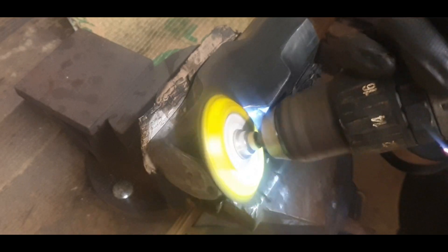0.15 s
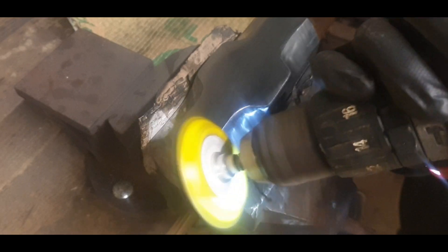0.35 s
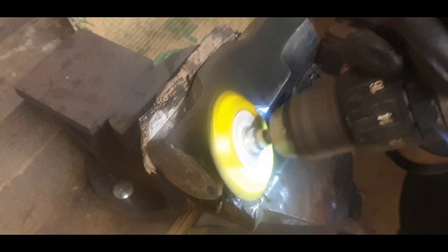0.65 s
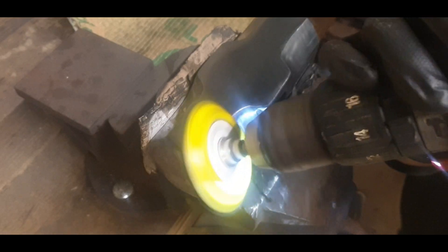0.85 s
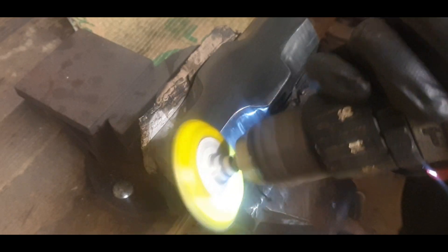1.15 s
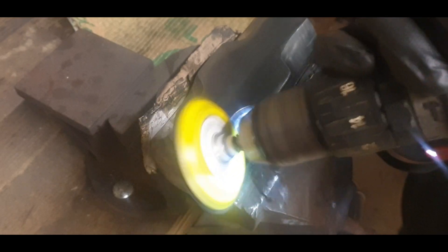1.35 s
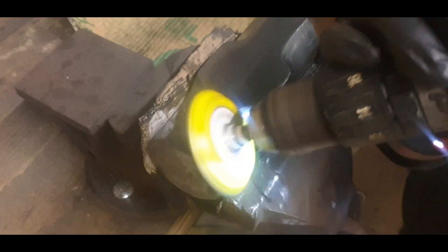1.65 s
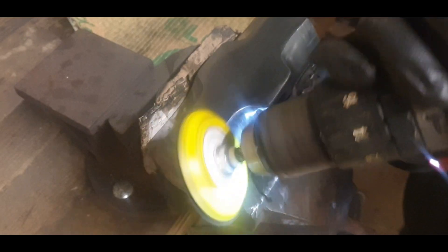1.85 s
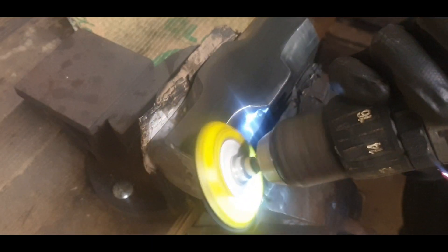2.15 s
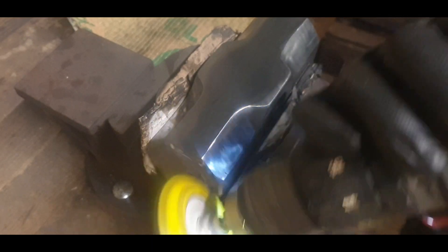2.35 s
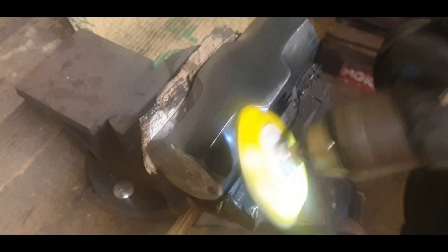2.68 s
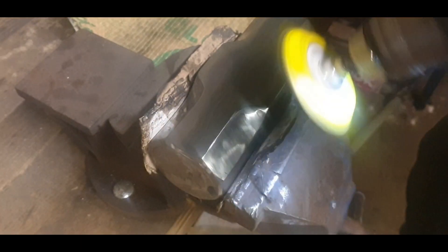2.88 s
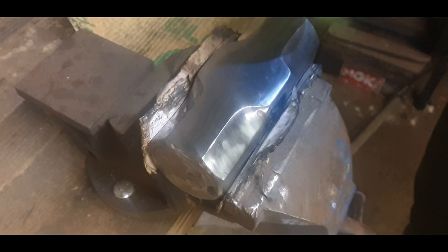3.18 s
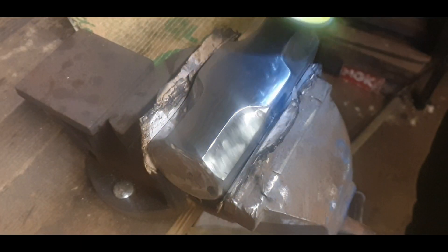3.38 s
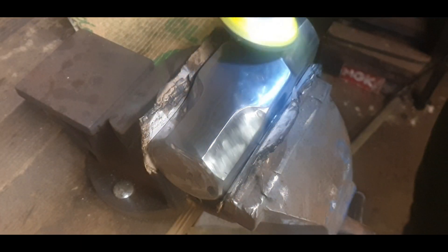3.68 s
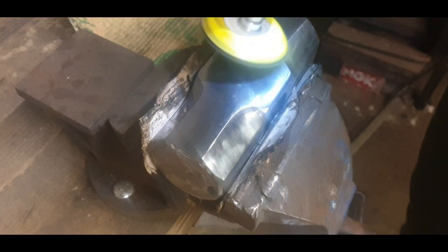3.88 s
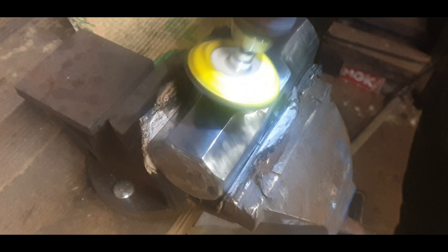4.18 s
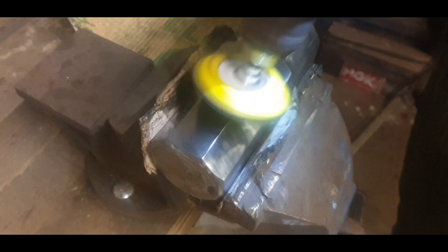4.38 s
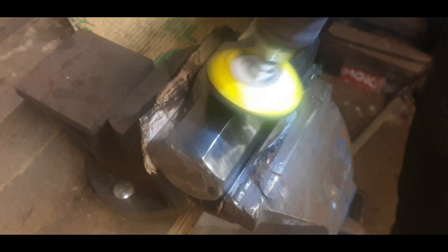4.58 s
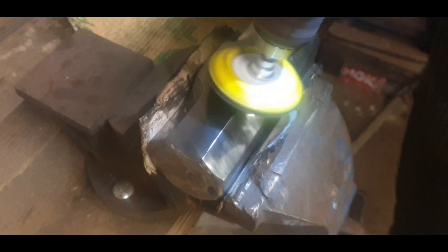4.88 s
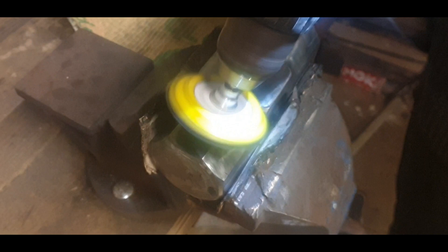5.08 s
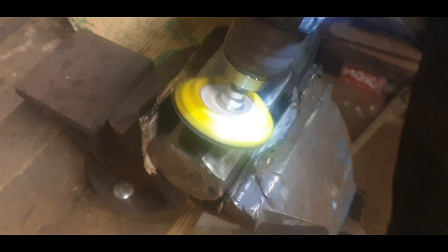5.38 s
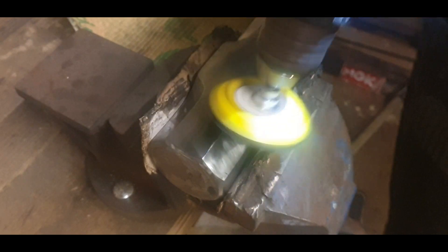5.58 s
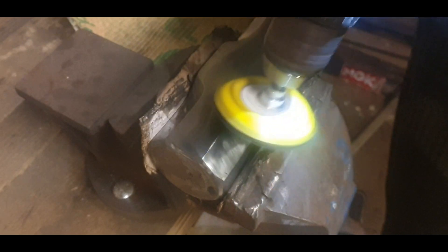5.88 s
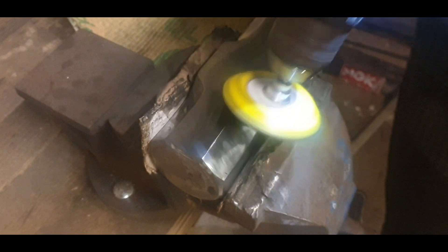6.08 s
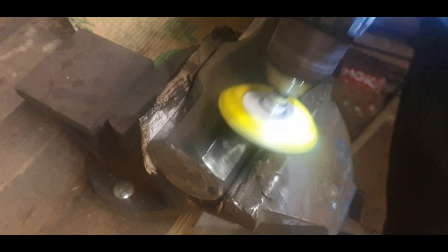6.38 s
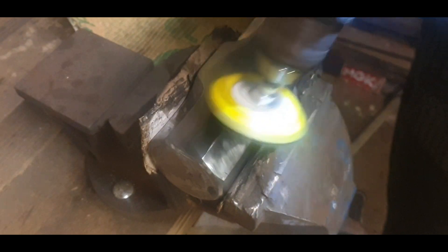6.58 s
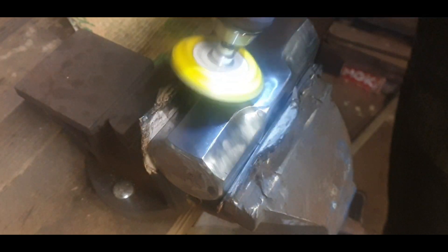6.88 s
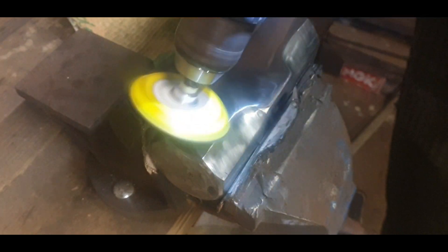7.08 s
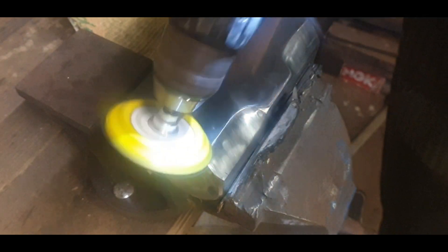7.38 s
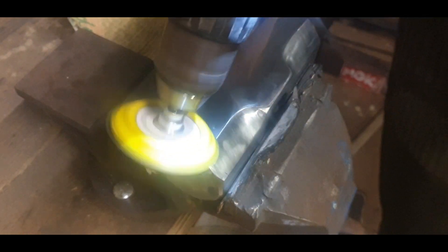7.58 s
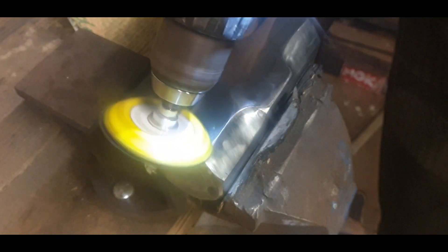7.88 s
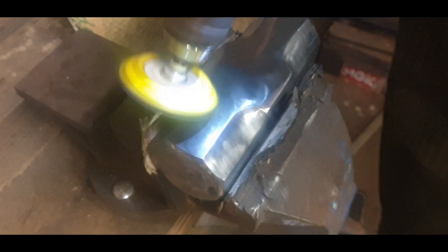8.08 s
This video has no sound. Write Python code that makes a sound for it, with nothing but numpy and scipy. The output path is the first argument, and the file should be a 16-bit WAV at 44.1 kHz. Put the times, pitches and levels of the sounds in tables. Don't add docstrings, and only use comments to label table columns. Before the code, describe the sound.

Close cordless drill held at full speed, a hard steady electric whine with a soft polishing pad hissing over a steel hammer head.

```python
import sys
import numpy as np
from scipy import signal
from scipy.io import wavfile
from scipy.ndimage import uniform_filter1d

SR = 44100
rng = np.random.default_rng(int(sys.argv[2]) if len(sys.argv) > 2 else 0)


def how_loud(loudness_db):
    steps = np.asarray(loudness_db, float) / 20
    return 10 ** steps


def dump_mix(stems):
    frames = np.atleast_2d(stems).T
    limited = np.clip(frames, -1, 1)
    pcm = np.round(limited * 32767).astype(np.int16)
    wavfile.write(sys.argv[1], SR, pcm)


N = 363384
TIME = np.arange(N) / SR
FRAME, HOP = 1024, 256

AIR_AND_PAD = [(60, -83, -86, -96), (130, -83.5, -83, -88), (236, -87, -82, -79), (490, -69.5, -72.5, -70),
               (730, -73, -69.5, -69), (1264, -61, -63.5, -62), (1630, -63, -66.5, -65),
               (3480, -66.5, -63.5, -61.5), (4750, -65, -70.5, -69), (6070, -72.5, -77.5, -75.5),
               (8030, -86, -87.5, -87), (9300, -80, -82.5, -84.5), (11300, -72, -73, -71.5),
               (13600, -76.5, -79, -77.5)]


def shaft(jitter_hz=.13):
    # t/s, f/Hz
    speed = [(0, 304.7), (.3, 304.6), (.45, 303), (1.12, 303.2), (1.25, 304.4), (1.65, 303.4),
             (2.32, 302.9), (2.55, 306.2), (3.1, 306.9), (3.78, 306.8), (4.24, 301.8), (4.5, 300.5),
             (5.02, 298.8), (5.2, 296.8), (6.35, 294.9), (6.75, 296.1), (8.03, 294.7), (8.15, 293.5)]
    stroke_hz, sag_hz = 3.02, .4
    first, last = 4.62, 7.2
    stroking = np.clip(np.minimum(TIME - first, last - TIME) * stroke_hz + 1, 0, 1)
    strokes = sag_hz * stroking * np.cos(2 * np.pi * stroke_hz * (TIME - first))
    jitter = jitter_hz * drift(12., count=1)[0]
    return np.cumsum(np.interp(TIME, *np.transpose(speed)) + strokes + jitter) / SR


def whine(turns, waver_db=.5, sway_db=1.3, flutter_db=.9, gear_sway_db=2.2):
    shaft_orders = [(1, -39.5, -37, -39.5), (2, -44, -34.5, -37.5), (3, -40, -47, -44.5),
                    (4, -33, -33.5, -26.5), (5, -36, -44, -42.5), (6, -47, -60, -60), (7, -48, -46, -42),
                    (8, -49.5, -44, -51.5), (9, -49, -45, -57), (10, -32, -33, -33.5), (11, -46, -52.5, -43),
                    (12, -47, -49, -51), (13, -43, -42, -45), (14, -59, -42, -44), (15, -49.5, -46, -47),
                    (16, -42, -49, -53),
                    (17, -53, -57, -48), (18, -53, -57, -55), (19, -57, -55, -53), (20, -56, -53, -54),
                    (30, -50, -52, -57), (33, -62, -57, -54), (34, -44.5, -47, -56), (35, -52, -54, -54),
                    (36, -51, -49, -53), (37, -51, -51, -55), (38, -56, -50, -51), (39, -49, -53, -56),
                    (40, -50, -47, -50), (41, -53, -51, -46), (42, -52, -51, -58), (44, -54, -60, -52),
                    (45, -58, -53, -49), (50, -55, -58, -57)]
    # multiple of shaft speed, level/dB against the gear carrier
    gear_tones = [(0.263, 0), (.2, -11), (0.798, -9.5), (22.2, -1)]
    top_order = 51
    over_hiss_db, scatter_db = [18.5, 17.5, 16.5], 3
    carrier, carrier_db = 0, [-59, -63.5, -53.5]

    t = TIME[::128]
    named = {round(k): np.array(db) for k, *db in shaft_orders}
    scatter = scatter_db * rng.standard_normal((top_order + 1, 3))
    usual_hz = turns[-1] * SR / N
    tones = []
    for k in range(1, top_order + 1):
        unnamed_db = colour(AIR_AND_PAD, k * usual_hz) + over_hiss_db + scatter[k]
        tones.append((k, aimed(k, named.get(k, unnamed_db), t)))
    for k, db in gear_tones:
        tones.append((k, db + aimed(carrier, carrier_db, t)))

    slow = drift(4.6, count=len(tones), t=t)
    fast = drift(32.0, count=len(tones), t=t)
    out = np.zeros(N)
    for (k, db), sway, flutter, start in zip(tones, slow, fast, rng.random(len(tones))):
        if k in (1, 2, 4, 10):
            depth_db = waver_db
        else:
            depth_db = gear_sway_db if k < 1 else sway_db
        size = np.interp(TIME, t, np.sqrt(2) * how_loud(db + depth_db * sway + flutter_db * flutter))
        out += size * np.cos(np.float32(2 * np.pi * ((k * turns + start) % 1)))
    return out


def aimed(order, db, t):
    # t/s, half length/s, shaft order (0 = gear carrier), level/dB
    wrist_turns = [(0.22, 0.2, 2, 5.5), (1.3, 0.099, 2, 3), (2.65, 0.14, 2, 5), (3.06, 0.097, 2, -16),
                   (3.9, 0.15, 2, 3), (4.7, 0.36, 2, -3), (7.75, 0.65, 0, -3), (2.648, 0.11, 4, 2.5),
                   (3.228, .09, 4, -1.5), (4.25, 0.22, 4, -2.5), (7.248, 0.59, 4, -1.5),
                   (8.24, 0.092, 4, -17), (.1, 0.37, 10, 2), (0.86, 0.36, 10, -3), (1.3, .1, 10, 1),
                   (2.15, 0.36, 10, -3), (2.73, 0.26, 10, 4), (3.09, 0.086, 10, -6), (3.9, .15, 10, 3.5),
                   (0.92, .12, 0, 7), (2.72, .14, 0, -14), (3.06, .08, 0, -10), (4.06, 0.26, 0, 5.5),
                   (5.099, 0.074, 0, -7), (4.75, 0.7, 34, 10), (2.45, .35, 15, 5), (4.15, .3, 16, 8),
                   (3.45, .4, 11, 0), (8, .7, 8, 12), (5.2, .4, 11, 5)]
    turned_db = sum(by * np.exp(-((t - s) / half) ** 2)
                    for s, half, k, by in wrist_turns if round(k) == order)
    return by_pose(db, t) + turned_db


def hiss(turns, patchy_db=.6, low_gate=.07, high_gate=.17, split_hz=7500):
    # t/s, level/dB of rub
    pressure = [(0, -.5), (.48, .8), (.72, -.8), (1.2, .3), (2.4, -.6), (2.5, 1.8), (2.66, 1.8),
                (2.69, -1.5), (2.98, -2), (3.1, 0), (4.2, 0), (5.1, .8), (6.85, -.8), (7.05, .8), (8.24, 0)]
    fizz_follows = -0.27
    t, z = spectrum(rng.standard_normal(N))
    high = (np.fft.rfftfreq(FRAME, 1 / SR) > split_hz)[:, None]
    swell_db = np.interp(t, *np.transpose(pressure)) * np.where(high, fizz_follows, 1)
    patches = uniform_filter1d(rng.standard_normal(z.shape), 12, 0)
    patches = evened(uniform_filter1d(patches, 16, 1))
    z *= how_loud(field(AIR_AND_PAD, t) + swell_db + patchy_db * patches) * np.sqrt(SR / 2)
    chop = sum(np.cos(2 * np.pi * k * turns) for k in (1, 2, 3)) / np.sqrt(3)
    rub = sound(z * ~high) * (1 + low_gate * chop)
    fizz = sound(z * high) * (1 + high_gate * chop)
    return rub + fizz


def covered(tones, same, other):
    cover_loss = [(60, -16, -23, -27), (230, -15, -25, -23.5), (534, -25, -22, -26), (825, -39, -42, -39),
                  (1350, -34.5, -33, -44), (2100, -28.5, -41, -41), (2895, -26.5, -27, -31),
                  (3570, -59, -81, -47), (4800, -29, -77, -72), (6500, -27.5, -30, -35),
                  (8200, -41, -61, -66), (9600, -38, -42, -39), (12300, -17, -26, -28.5),
                  (15900, -43, -33, -29)]
    # f/Hz, likeness 0-1
    likeness = [(60, 0.2), (400, 0.4), (1400, 0.8), (3000, 0.5), (7000, .2), (15000, .1)]
    # [ms] pad left, lifted, pad above
    lead_ms = [.14, 0.023, -.02]
    t, z = spectrum(np.array([tones, same, other]))
    hz = np.fft.rfftfreq(FRAME, 1 / SR)[:, None]
    like_hz, like_share = np.transpose(likeness)
    like = np.clip(np.interp(np.log(hz + 1), np.log(like_hz), like_share), 0, 1)
    lead = np.exp(2j * np.pi * hz * by_pose(lead_ms, t) / 1000)
    heard = lead * (z[0] + like * z[1]) + np.sqrt(1 - like ** 2) * z[2]
    return sound(heard * how_loud(field(cover_loss, t - .22)))


def buffet(wake_db=-10., flutter_db=-12., spread=.68, wake_s=.016, calm_db=-75.):
    # t/s, peak level/dB, f/Hz
    puffs = [(.496, -45, 61.5), (.875, -48, 90), (.904, -39, 65), (1.142, -46, 101), (1.245, -38, 81),
             (1.321, -45, 57), (1.414, -40, 100), (1.482, -38, 82), (1.515, -33, 83), (1.582, -32.5, 112),
             (1.596, -34, 84.6), (1.641, -36, 109), (1.667, -40, 77), (1.71, -41, 129), (1.735, -35, 80),
             (1.804, -41, 70), (1.876, -39, 64), (1.945, -34, 98), (1.995, -36, 98), (2.032, -38, 78),
             (2.081, -37, 115), (2.14, -33, 110), (2.187, -44, 150), (2.483, -44, 150), (2.511, -38, 75),
             (2.54, -46, 80), (2.576, -44, 119), (3.05, -35, 97), (3.099, -38, 100), (3.152, -47, 107)]
    puff_s, swings = .007, .5
    edge_db, edge_db_per_octave, puff_hz = -24, 8, 85
    low = evened(band(rng.standard_normal(N), 29, 78))
    flutter = evened(band(rng.standard_normal(N), 125, 250))
    edge = evened(band(rng.standard_normal(N), 260, 560))
    out = how_loud(calm_db) * (low + flutter)
    for (s, db, hz), start in zip(puffs, rng.random(len(puffs))):
        near = slice(int((s - .15) * SR), int((s + .15) * SR))
        t = TIME[near] - s
        lump = np.exp(-.5 * (t / (spread * (puff_s + swings / hz))) ** 2)
        push = np.sqrt(2) * np.cos(2 * np.pi * (hz * t + start)) + how_loud(flutter_db) * flutter[near]
        wake = how_loud(wake_db) * np.exp(-.5 * (t / wake_s - 1) ** 2) * low[near]
        sharp_db = edge_db + edge_db_per_octave * np.log2(hz / puff_hz)
        out[near] += how_loud(db) * (lump * push + lump ** 2 * how_loud(sharp_db) * edge[near] + wake)
    return band(out, 35, 750)


def by_pose(values, t):
    # t/s, pose (0 pad left, 1 lifted, 2 pad above)
    pose_curve = [
        (0, 0.07),
        (2.75, 0.066),
        (3.12, 1),
        (3.9, 1.27),
        (4.7, 1.67),
        (8.24, 2.18),
    ]
    pose = np.clip(np.interp(t, *np.transpose(pose_curve)), 0, 2)
    return np.interp(pose, np.arange(3), values)


def colour(table, hz):
    at, *poses = np.transpose(table)
    return np.array([np.interp(np.log(hz), np.log(at), p) for p in poses])


def field(table, t):
    hz, *poses = np.transpose(table)
    bins = np.log(np.fft.rfftfreq(FRAME, 1 / SR) + 1)
    return sum(np.outer(np.interp(bins, np.log(hz), p), by_pose(np.eye(3)[k], t))
               for k, p in enumerate(poses))


def drift(rate_hz, count, t=TIME):
    coarse = rng.standard_normal((count, 900))
    pole = np.exp(-2 * np.pi * rate_hz / 100)
    smooth = signal.lfilter([1], [1, -2 * pole, pole ** 2], coarse)
    smooth = evened(smooth[:, 60:])
    return [np.interp(t, np.arange(840) / 100, row) for row in smooth]


def evened(x):
    return x / np.sqrt(np.mean(abs(x) ** 2) + 1e-20)


def band(x, lo_hz, hi_hz, order=2):
    return signal.sosfilt(signal.butter(order, [lo_hz, hi_hz], "band", fs=SR, output="sos"), x)


def spectrum(x):
    return signal.stft(x, SR, nperseg=FRAME, noverlap=FRAME - HOP)[1:]


def sound(z):
    return signal.istft(z, SR, nperseg=FRAME, noverlap=FRAME - HOP)[1][:N]


def scene():
    turns = shaft()
    tones = whine(turns)
    near = hiss(turns)
    air = buffet()
    open_port = tones + near + how_loud(-55) * air
    covered_port = covered(tones, near, hiss(turns)) + air
    return np.array([open_port, covered_port])


def top_cut(x):
    return signal.sosfilt(signal.butter(12, 15770, fs=SR, output="sos"), x)


def record(dry):
    # f/Hz, level/dB open port, level/dB covered port
    dropout = [(300, -30, -30), (800, -16, -3), (6300, -9, 2), (7400, 1, 5), (8700, 3, 5), (9800, -5, 0),
               (15500, -4, -2)]
    window = np.sin(np.pi * (np.arange(2048) + .5) / 2048)
    hz, _, z = signal.stft(dry, SR, window=window, nperseg=2048, noverlap=1024)
    at, *ports_db = np.transpose(dropout)
    least = how_loud(np.array([np.interp(hz, at, db) for db in ports_db]))[:, :, None]
    usual = np.exp(uniform_filter1d(np.log(abs(z) + 1e-12), size=24, axis=1))
    wander_db = 3.5 * rng.standard_normal((2, 65, z.shape[2])).repeat(16, axis=1)[:, :len(hz)]
    z *= abs(z) > least * usual * how_loud(wander_db)
    gated = signal.istft(z, SR, window=window, nperseg=2048, noverlap=1024)[1][:, :N]
    return top_cut(gated)


dry = scene()
out = record(dry)
dump_mix(out)
```